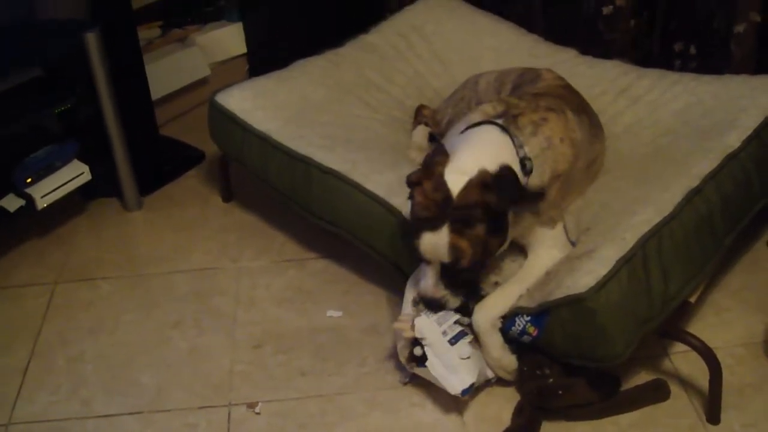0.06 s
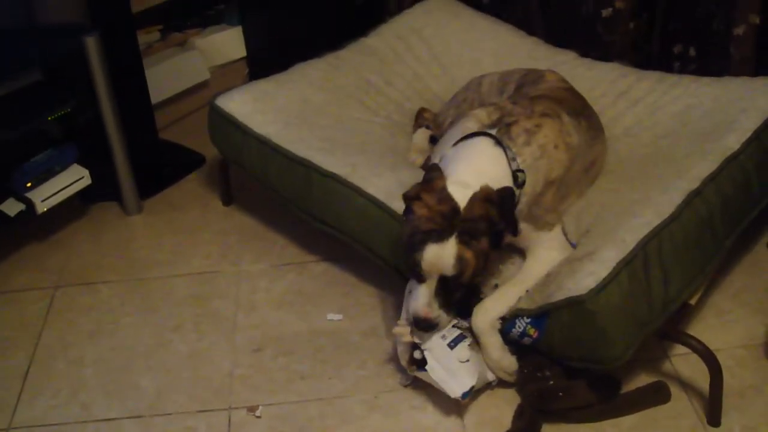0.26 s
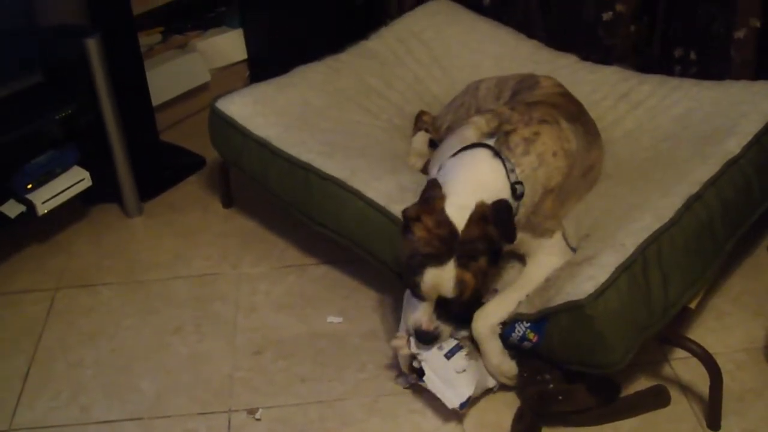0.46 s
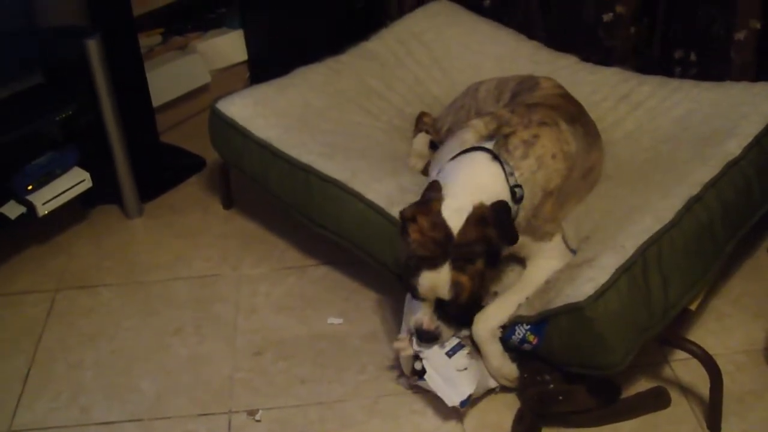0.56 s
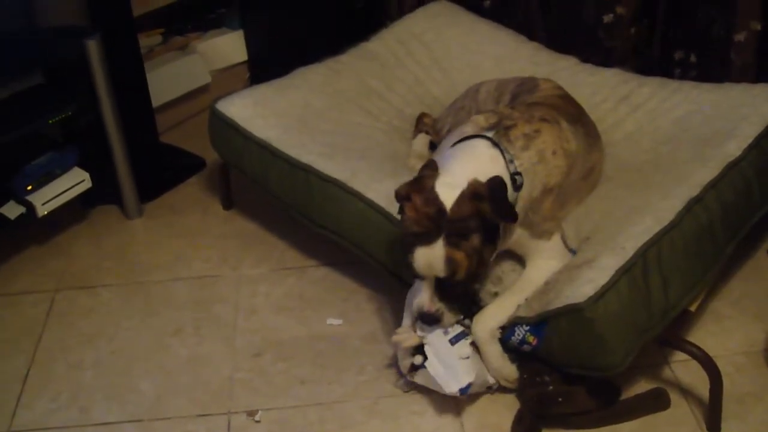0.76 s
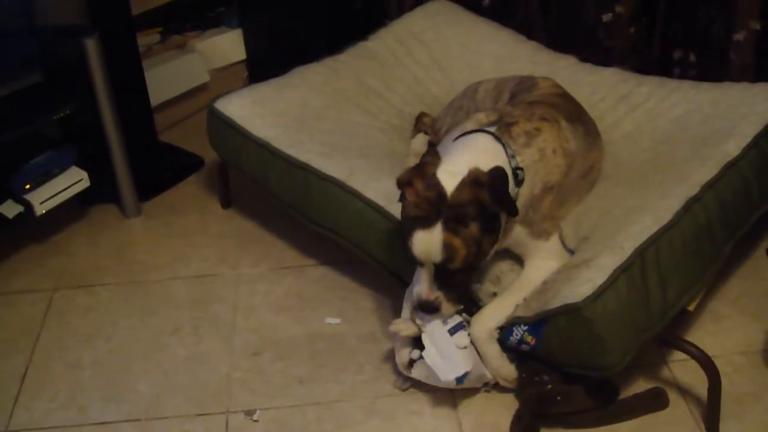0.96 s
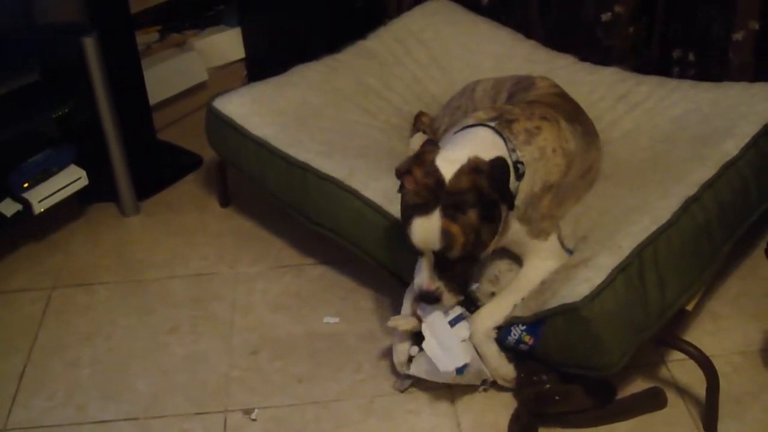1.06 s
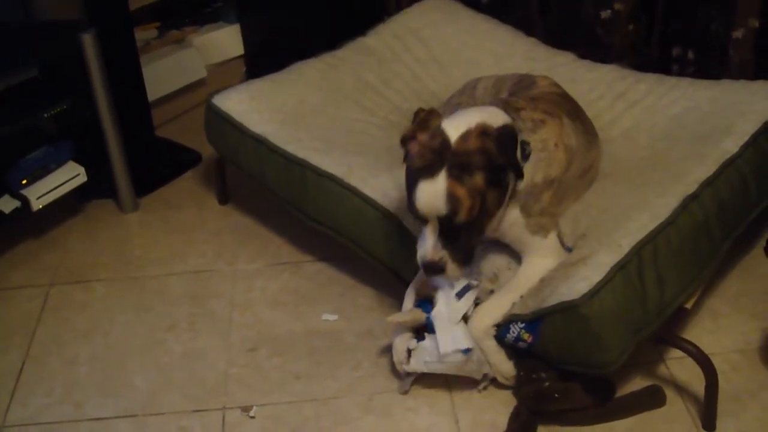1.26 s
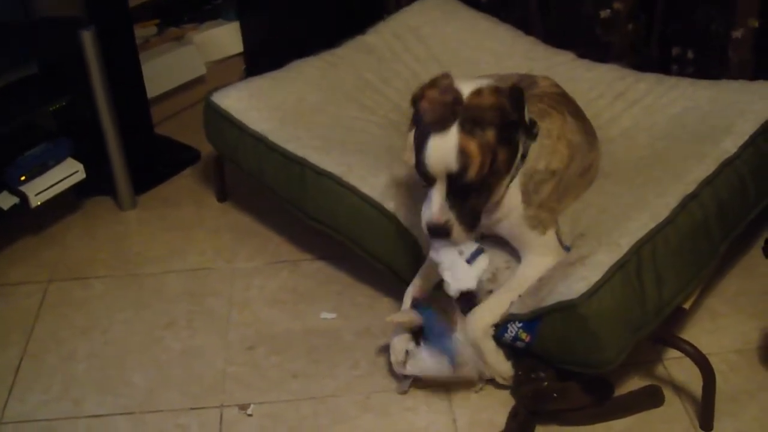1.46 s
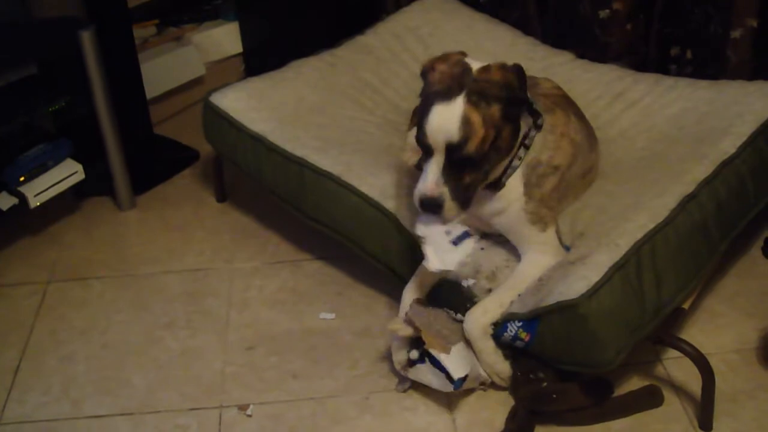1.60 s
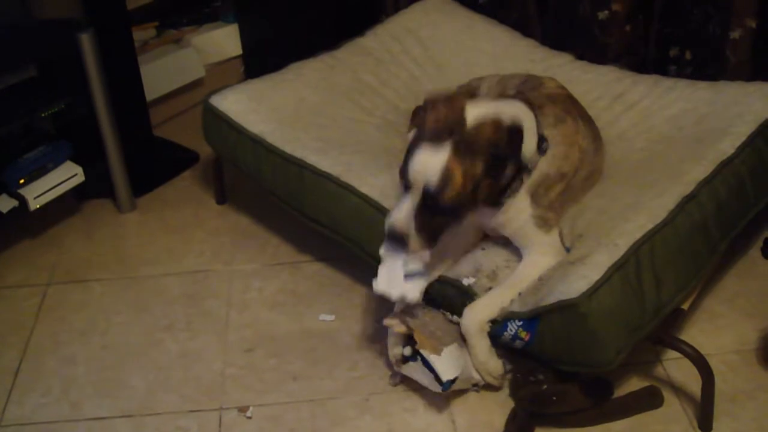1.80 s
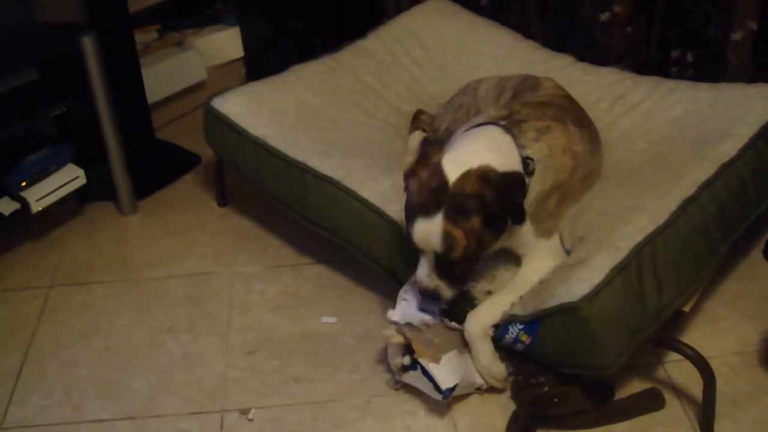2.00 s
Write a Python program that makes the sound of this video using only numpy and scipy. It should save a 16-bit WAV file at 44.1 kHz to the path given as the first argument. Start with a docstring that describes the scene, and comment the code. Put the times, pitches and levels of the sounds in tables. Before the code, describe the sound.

Paper tears in one loud, jerky rip, after some quiet crinkling and ticking from a dog chewing a padded envelope. The sound is straight ahead of the microphone in a small room, over faint hiss and hum.

```python
"""Over a faint hum and hiss, soft rustles and ticks: a dog pins a padded paper envelope on a tiled floor
and worries it with its teeth. Then one half-second rip runs in fits, fibres crackling while the sheet
buckles, snaps and flaps. A small living room, the envelope straight ahead of a stereo pair of
microphones, at a distance where the room is nearly as loud as the direct sound."""
import sys
import numpy as np
from scipy import signal
from scipy.fft import rfft, irfft, next_fast_len
from scipy.io import wavfile

SR = 44100
rng = np.random.default_rng(int(sys.argv[2]) if len(sys.argv) > 2 else 0)


def materialize(psi):
    """Save the field psi as 16-bit PCM at rate SR to the path in sys.argv[1].

    A 1-D psi becomes a single channel; in a 2-D psi each row is a channel.
    """
    bounded = np.clip(np.atleast_2d(psi).T, -1, 1)
    quanta = np.round(bounded * 32767).astype(np.int16)
    wavfile.write(sys.argv[1], SR, quanta)


N = 89919
TIME = np.arange(N) / SR
TOP_HZ = 11020  # upper band limit


def amp(db):
    """Decibels to gain."""
    return 10 ** (np.asarray(db) / 20)


def unit(x):
    """Scale to rms 1."""
    return x / np.sqrt(np.mean(x ** 2) + 1e-20)


def along(points, hz):
    """Read (f/Hz, value) points on a log frequency axis."""
    f, values = np.transpose(points)
    return np.interp(np.log(hz + 1), np.log(f + 1), values)


def filtered(x, response):
    """x through a gain that depends on frequency."""
    size = next_fast_len(N + SR // 2)
    return irfft(rfft(x, size) * response(np.fft.rfftfreq(size, 1 / SR)), size)[..., :N]


def coloured(x, spectrum):
    """x through a (f/Hz, level/dB) spectrum, at rms 1."""
    return unit(filtered(x, lambda hz: amp(along(spectrum, hz))))


def strokes(rows, attack_s, release_s):
    """One attack-hold-release curve for each level column of (t/s, length/s, level/dB, ..) rows."""
    power = 0
    for start, length, *levels in rows:
        rise = np.clip((TIME - start) / attack_s, 0, 1)
        fall = np.exp(-np.maximum(TIME - start - length, 0) / release_s)
        power = power + np.outer(amp(levels), rise * fall) ** 2
    return np.sqrt(power)


def pitched(x, rows, q, attack_s, release_s):
    """Strokes of x, each (t/s, length/s, level/dB, f/Hz) row through its own resonance."""
    total = 0
    for start, length, db, hz in rows:
        level, = strokes([(start, length, db)], attack_s, release_s)
        total = total + level * unit(signal.lfilter(*signal.iirpeak(hz, q, SR), x))
    return total


def crackle(per_s, spread_db, spectrum):
    """Tiny breaks at random moments and of uneven size, coloured by the paper."""
    happens = rng.random(N) < per_s / SR
    size = amp(spread_db * np.clip(rng.standard_normal(N), -2, 1)) * rng.choice([-1, 1], N)
    return coloured(happens * size, spectrum)


# spectrum of the recorder's hiss, and partials of the hum: f/Hz, level/dB
HISS_SPECTRUM = [(25, -46), (80, -31), (105, -16), (150, -11), (250, -4.5), (340, -0.5), (520, -6),
                 (850, -5), (1700, -11.5), (4000, -16.5), (11000, -19.5)]
HUM_PARTIALS = [(119, -70.5), (157, -62)]
# likeness of the hiss in the two channels: f/Hz, correlation
HISS_CORRELATION = [(60, -0.54), (170, -0.84), (490, -0.66), (1400, -0.42), (4000, -0.18), (11000, -0.27)]


def hiss_and_hum(hiss_db=-40):
    """The recorder's steady hiss, with a faint low hum."""
    def mid_side_gains(hz):
        angle = np.arccos(np.clip(along(HISS_CORRELATION, hz), -1, 1)) / 2
        return amp(along(HISS_SPECTRUM, hz)) * [np.cos(angle), np.sin(angle)]

    mid, side = filtered(rng.standard_normal((2, N)), mid_side_gains)
    hiss = unit(np.array([mid + side, mid - side]))
    hum = sum(amp(db) * np.sqrt(2) * np.sin(2 * np.pi * (hz * TIME + rng.random()))
              for hz, db in HUM_PARTIALS)
    return amp(hiss_db) * hiss + hum


# paper on muzzle and paws: t/s, length/s, crinkle level/dB, scuff level/dB, scrape f/Hz
RUBS = [(0.103, 0.17, -48.5, -54, 2020), (0.301, 0.2, -47.5, -52, 840), (0.497, 0.26, -54, -52, 820),
        (0.707, .045, -49, -43.5, 1480), (0.761, 0.11, -41.5, -58, 2400), (0.9, 0.19, -53.5, -51.5, 813),
        (1.67, .12, -63, -55, 1014), (1.856, 0.1, -48, -54.5, 1750)]
# teeth slipping on the paper: t/s, length/s, level/dB, f/Hz
TOOTH_SLIPS = [(.175, 0.18, -60, 1990), (0.208, .07, -58, 5340), (0.373, .02, -50, 1270),
               (1.925, 0.0083, -46, 2020)]
# bright crinkle and duller scuff: f/Hz, level/dB
CRINKLE_SPECTRUM = [(60, -45), (400, 1), (1500, -1), (3000, 3.5), (5500, 2.5), (8500, 2.5), (11000, -0.5)]
SCUFF_SPECTRUM = [(100, -15), (300, 0.5), (800, 1.5), (1400, -7.5), (2000, 2), (3000, 2.5), (5000, -4.5),
                  (11000, -12)]


def rustling():
    """The dog shifts its grip: paper rubs with a faintly pitched scrape, and slipping teeth squeak."""
    fades = dict(attack_s=0.057, release_s=0.03)
    rubs = np.array(RUBS)
    crinkle_level, scuff_level = strokes(rubs[:, :4], **fades)
    friction = crackle(per_s=3000, spread_db=3, spectrum=SCUFF_SPECTRUM)
    crinkle = crackle(per_s=9000, spread_db=0.5, spectrum=CRINKLE_SPECTRUM)
    scrape = pitched(friction, rubs[:, [0, 1, 3, 4]], q=14, **fades)
    squeak = pitched(friction, TOOTH_SLIPS, q=36, attack_s=0.002, release_s=0.0041)
    return crinkle_level * crinkle + scuff_level * friction + amp(-7) * scrape + squeak


# creases snapping through, at the paper: t/s, peak level/dB, f/Hz
CREASE_SNAPS = [(.385, -40, 1300), (.454, -34, 970), (.721, -34, 440), (.7625, -30.5, 2170),
                (.95, -28.5, 5500), (0.9688, -30, 2620), (1.0161, -28.5, 7040), (1.1115, -18, 2600),
                (1.15, -4.5, 1550), (1.1627, -21, 2580), (1.1726, -9.5, 8950), (1.2151, -18.5, 800),
                (1.2651, -3.5, 3100), (1.271, -7, 6170), (1.282, -15, 7860), (1.3374, -17, 7500),
                (1.3907, -17, 3000), (1.4168, -13, 4500), (1.632, -31.5, 1190), (1.701, -34, 1800)]


def snapping(overtone_ratio=1.76, crack_gain=1.77, shortest_s=0.00037, ring_cycles=1.2):
    """A crease gives way: a brief crack and two modes in a band round its pitch; low ones ring longer."""
    track, t = np.zeros(N + SR), np.arange(SR // 40) / SR
    for start, db, hz in CREASE_SNAPS:
        ring = np.sin(2 * np.pi * hz * t) + amp(-4.5) * np.sin(2 * np.pi * overtone_ratio * hz * t)
        crack = crack_gain * rng.standard_normal(len(t))
        decay = np.exp(-(t / (shortest_s + ring_cycles / hz)) ** 2)
        band_hz = np.minimum([0.46 * hz, 2.37 * hz], TOP_HZ)
        snap = signal.lfilter(*signal.butter(2, band_hz, "bandpass", fs=SR), (ring + crack) * decay)
        track[round(start * SR):][:len(t)] += amp(db) * snap / np.abs(snap).max()
    return track[:N]


# pulls on the envelope, down on the tiles: t/s, length/s, level/dB
PULLS = [(1.03, 0.125, -65), (1.23, .045, -59), (1.49, 0.018, -77)]
# their dull thud: f/Hz, level/dB
THUD_SPECTRUM = [(20, -10), (50, -15), (95, -2), (150, 2), (400, -40)]


def tugging():
    """Each tug on the pinned envelope thuds softly."""
    level, = strokes(PULLS, attack_s=0.011, release_s=0.008)
    return level * coloured(rng.standard_normal(N), THUD_SPECTRUM)


# flaps of the loose envelope: t/s, length/s, level/dB, f/Hz
SHEET_FLAPS = [(1.068, 0.062, -46, 370), (1.147, 0.012, -40, 245), (1.206, 0.013, -42, 680),
               (1.242, 0.037, -38, 434), (1.331, 0.016, -41, 330), (1.386, 0.0098, -31.5, 673),
               (1.416, 0.032, -41.5, 192), (1.463, 0.057, -42, 426), (1.473, 0.019, -43, 175),
               (1.534, 0.008, -37.5, 586)]
# body of the padded sheet: f/Hz, level/dB
FLAP_SPECTRUM = [(30, -60), (80, -48), (120, -20), (170, 0), (300, 3), (450, 8), (750, -0.5), (1200, 9.5),
                 (3000, -42)]


def flapping():
    """The padded sheet flaps as it is pulled: a broad flutter and a hollow pitch."""
    fades = dict(attack_s=0.0044, release_s=0.013)
    level, = strokes([row[:3] for row in SHEET_FLAPS], **fades)
    flutter = level * crackle(per_s=500, spread_db=3.5, spectrum=FLAP_SPECTRUM)
    buckling = crackle(per_s=500, spread_db=0.5, spectrum=FLAP_SPECTRUM)
    hollow = pitched(buckling, SHEET_FLAPS, q=2.45, **fades)
    return amp(-4.5) * flutter + hollow


# runs of the tear: t/s, length/s, fizz level/dB, crumple level/dB, free strip f/Hz, fizz peak f/Hz
TEAR_RUNS = [(1.07, 0.033, -27.5, -29.5, 2900, 7400), (1.105, 0.045, -32.5, -31.5, 2980, 8000),
             (1.133, 0.023, -32, -28.5, 2720, 3500), (1.154, 0.019, -28, -25, 1430, 10000),
             (1.167, 0.048, -34, -30, 1540, 5500), (1.219, 0.021, -26.5, -30, 1010, 7100),
             (1.244, 0.013, -24, -28, 1170, 8800), (1.276, 0.0533, -25.5, -30.5, 2200, 10700),
             (1.336, .045, -29, -33.5, 2000, 5100), (1.371, 0.0085, -24, -29, 2500, 7600),
             (1.3803, 0.0057, -21.5, -24, 2500, 8700), (1.3882, 0.0069, -13, -22, 2640, 5500),
             (1.4, 0.012, -27, -28, 1540, 6700), (1.409, 0.0078, -19, -25, 2250, 10300),
             (1.417, 0.02, -30, -25.5, 2280, 4730), (1.437, 0.039, -30, -30.5, 2020, 6950),
             (1.474, 0.0046, -18, -22, 2570, 6300), (1.48, 0.011, -22.5, -24, 2360, 4700),
             (1.493, 0.026, -32, -33, 2160, 4680), (1.521, 0.01, -37, -28, 970, 4450)]
# breaking fibres, crumpling sheet and the creases that shake the free strip: f/Hz, level/dB
FIBRE_SPECTRUM = [(30, -75), (90, -59), (300, -23), (1500, -19), (3000, -1), (5000, 2.5), (7500, 1),
                  (9500, 2.5), (11000, -1.5)]
SHEET_SPECTRUM = [(40, -62), (130, -39), (250, -7), (500, -7), (900, 3.5), (1300, -5), (1800, -3),
                  (2600, -0.5), (4000, -3), (10000, -10.5)]
STRIP_SPECTRUM = [(30, -65), (90, -47), (600, 0.5), (11000, 0)]


def tearing(fibres_per_s=3500, creases_per_s=1500):
    """Each run of the tear breaks fibres, crumples the sheet and rattles the strip that it sets free."""
    def blend(broad, narrow, narrow_db):
        return (broad + amp(narrow_db) * narrow) / np.hypot(1, amp(narrow_db))

    fades = dict(attack_s=0.0013, release_s=0.0032)
    runs = np.array(TEAR_RUNS)
    fizz_level, crumple_level = strokes(runs[:, :4], **fades)
    fizz = fizz_level * crackle(fibres_per_s, spread_db=5, spectrum=FIBRE_SPECTRUM)
    breaks = crackle(fibres_per_s, spread_db=4, spectrum=FIBRE_SPECTRUM)
    fizz_peak = pitched(breaks, runs[:, [0, 1, 2, 5]], q=8.2, **fades)
    crumple = crumple_level * crackle(creases_per_s, spread_db=2.5, spectrum=SHEET_SPECTRUM)
    creases = crackle(creases_per_s, spread_db=4.5, spectrum=STRIP_SPECTRUM)
    strip = pitched(creases, runs[:, [0, 1, 3, 4]], q=1.6, **fades)
    return blend(fizz, fizz_peak, narrow_db=-5.5) + blend(crumple, strip, narrow_db=-1.5)


# the living room's decay: f/Hz, t60/s
ROOM_DECAY = [(150, 0.31), (1000, 0.44), (4000, 0.38), (11000, 0.26)]


def room(x, tail_db=-2.5, walls_db=-5.5, onset_s=0.002):
    """Ten reflections off near walls and a diffuse tail, different at each microphone."""
    hz, t, noise = signal.stft(rng.standard_normal((2, SR // 2)), SR, nperseg=256)
    _, tail = signal.istft(noise * amp(-60 * t / along(ROOM_DECAY, hz)[:, None]), SR, nperseg=256)
    tail *= 1 - np.exp(-(np.arange(tail.shape[1]) / SR / onset_s) ** 2)
    walls = np.zeros_like(tail)
    for channel in walls:
        channel[rng.integers(SR // 700, SR // 50, size=10)] = rng.standard_normal(size=10)
    response = sum(amp(db) * part / np.linalg.norm(part, axis=1, keepdims=True)
                   for db, part in [(tail_db, tail), (walls_db, walls)])
    return signal.fftconvolve(x[None], response, axes=1)[:, :N]


# colour of the room's answer at the microphones: f/Hz, level/dB
REFLECTION_SPECTRUM = [(150, -2), (500, -.5), (1500, -3), (4000, -1.5), (11000, 1)]


def shifting_reflections(paper, step_s=0.12):
    """The paper moves with the dog's head, so each pattern of reflections fades into a new one."""
    answer = 0
    for centre in np.arange(0, TIME[-1] + step_s, step_s):
        crossfade = np.cos(np.pi / 2 * np.clip((TIME - centre) / step_s, -1, 1))
        answer = answer + room(paper * crossfade)
    return filtered(answer, lambda hz: amp(along(REFLECTION_SPECTRUM, hz)))


# balance across the microphone pair: f/Hz, left minus right level/dB
MIC_BALANCE = [(200, -3.5), (600, 0), (1200, -.5), (2500, 1.6), (5400, -1.4), (11000, 0)]


def scene():
    """The envelope on the living room floor, straight ahead of the microphones."""
    paper = rustling() + snapping() + tugging() + flapping() + tearing()
    in_room = paper + shifting_reflections(paper)
    at_mics = filtered(in_room, lambda hz: amp(np.outer([0.5, -0.5], along(MIC_BALANCE, hz))))
    return hiss_and_hum() + at_mics


def record(dry):
    """The recorder keeps nothing above its band limit."""
    return filtered(dry, lambda hz: 1 / np.sqrt(1 + (hz / TOP_HZ) ** 600))


dry = scene()
out = record(dry)
materialize(out)
```